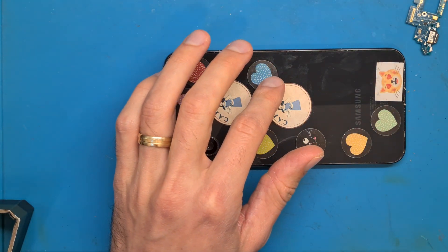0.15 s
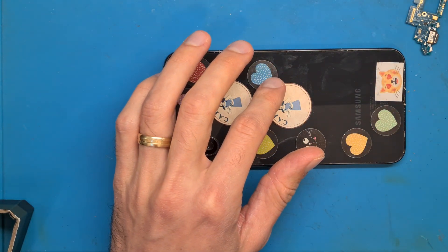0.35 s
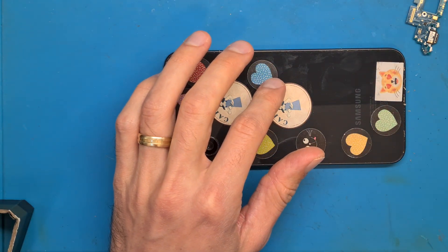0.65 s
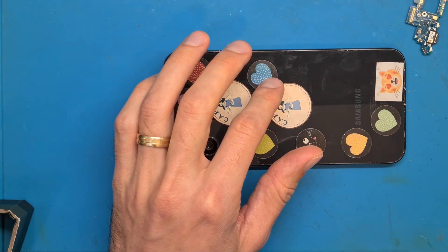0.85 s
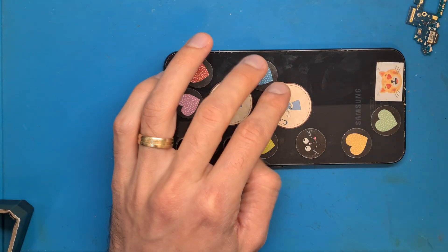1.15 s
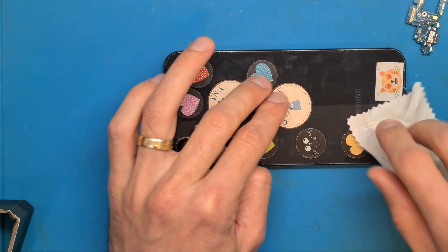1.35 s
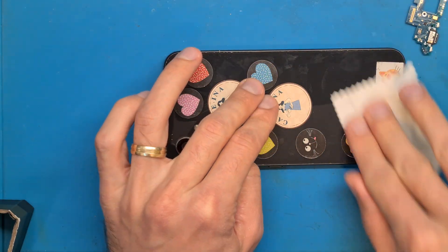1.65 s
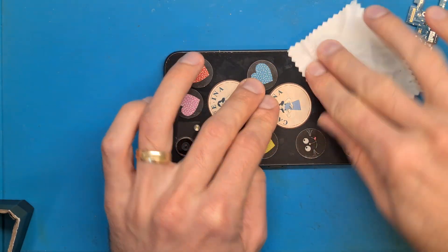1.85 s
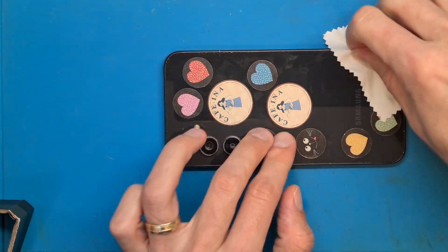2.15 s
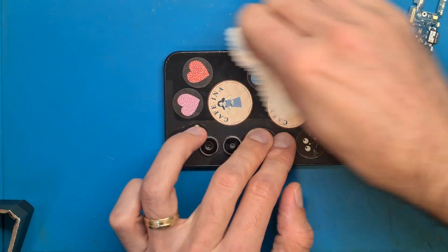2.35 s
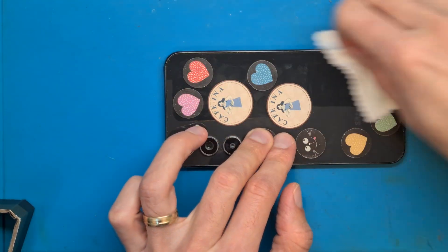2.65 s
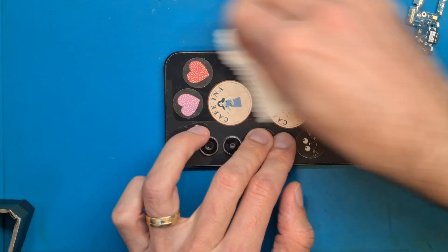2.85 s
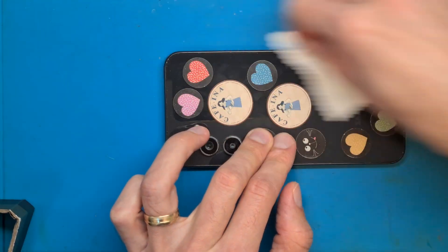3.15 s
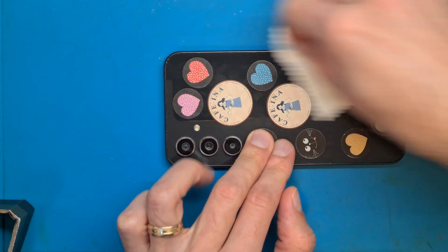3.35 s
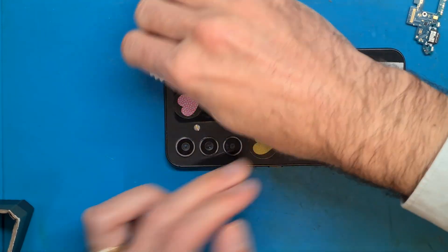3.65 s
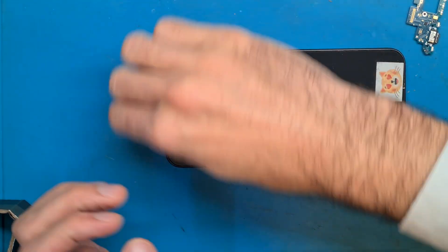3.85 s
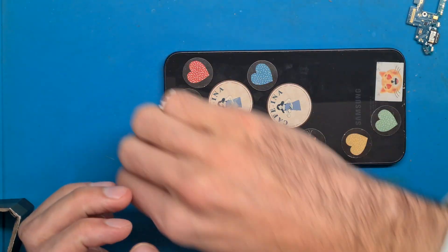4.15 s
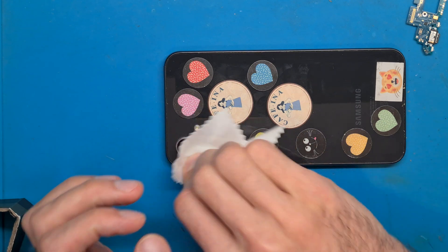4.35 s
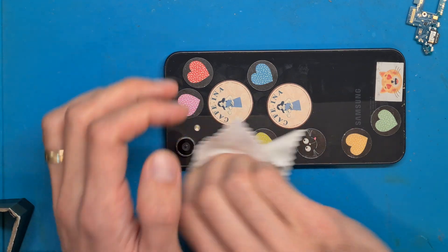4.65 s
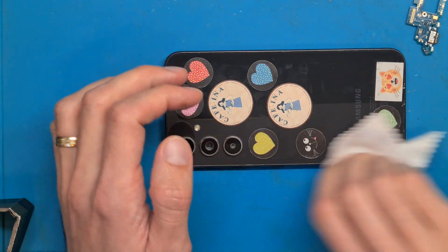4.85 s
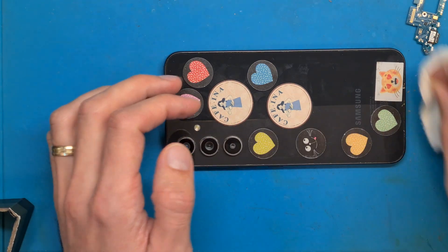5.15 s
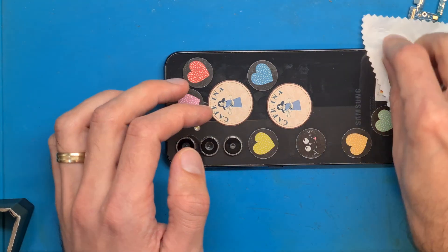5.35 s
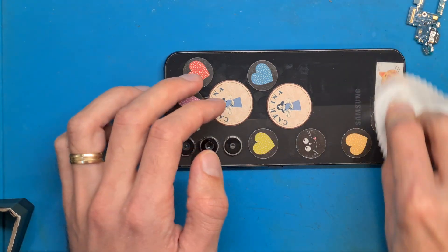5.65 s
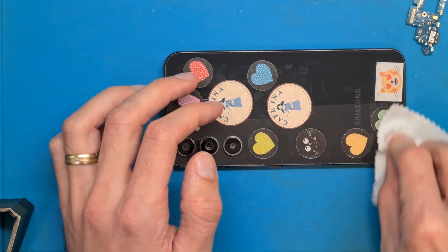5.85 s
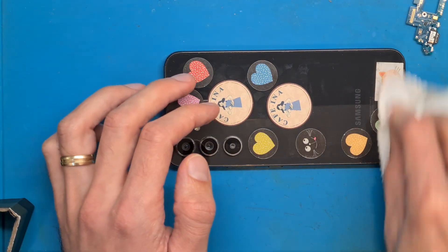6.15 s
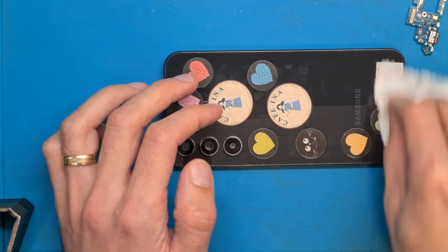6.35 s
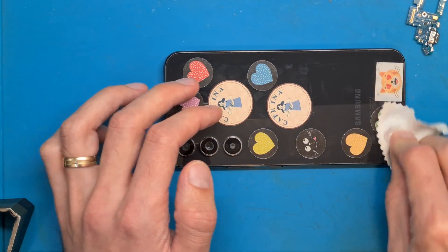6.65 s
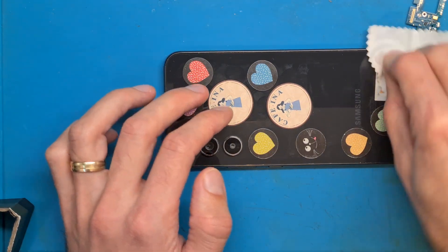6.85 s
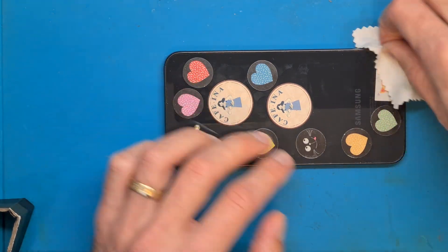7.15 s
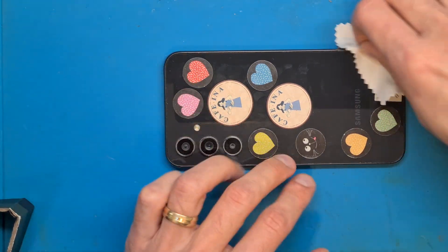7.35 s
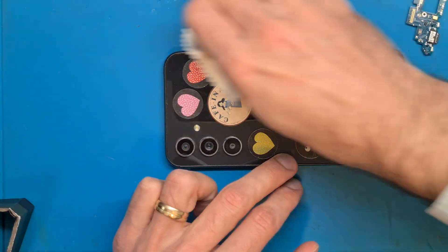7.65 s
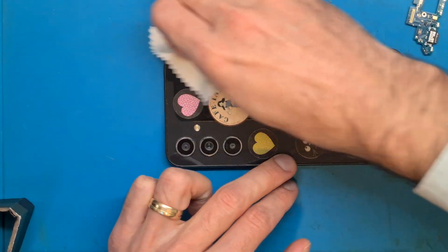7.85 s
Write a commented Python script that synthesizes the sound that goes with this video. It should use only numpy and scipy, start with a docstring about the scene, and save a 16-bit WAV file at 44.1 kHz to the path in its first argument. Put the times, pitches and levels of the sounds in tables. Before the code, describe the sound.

Brief cloth rustles and a cluster of small hard taps come first, then a near pause, then deep muffled bench bumps and swishing wipes over glass. A sharp crack with a tight echo cuts through once. After a short lull with a faint low squeak, longer strokes become quick and regular. Close, intimate stereo pickup, lightly reverberant room, low motor drone and faint fan hiss throughout.

```python
"""A soft cloth wipes the glass back of a phone on a workbench, under a pair of microphones. From the start,
friction noise hisses, swishes and drags; a two-tone engine drone comes through the wall, over a hum of sines,
narrow low rumbles and fan hiss of narrow noise, and broad room noise. Noise-driven body modes tick from 0.1 s,
and hands thump decaying bench modes from 0.6 s. Resonant noise chirps from 1.3 s, decaying modes snap once at
2.6 s, and gliding sines squeak from 3.2 s."""
import sys
import numpy as np
from scipy import signal
from scipy.fft import rfft, irfft
from scipy.io import wavfile
from scipy.ndimage import uniform_filter1d

SR = 44100
rng = np.random.default_rng(int(sys.argv[2]) if len(sys.argv) > 2 else 0)


def file_out(sig):
    """Save sig as 16-bit WAV at sys.argv[1]."""
    # one column per channel
    cols = np.atleast_2d(sig).T
    # limit, then scale
    lim = np.clip(cols, -1, 1)
    pcm = np.round(lim * 32767).astype(np.int16)
    wavfile.write(sys.argv[1], SR, pcm)


N = 352800  # samples: 8 s


# Spectra of fibre hiss, swish on the glass and drag on the mat.
# Each row: frequency in Hz, relative density in dB per Hz.
HISS_SPECTRUM = [(3820, -31), (6500, -6.5), (7410, -12), (8270, -11), (9030, -1.5), (10600, -9),
                 (13000, -4), (15600, -15)]
SWISH_SPECTRUM = [(650, -21), (1100, -10.5), (1500, -10.5), (2300, -9.5), (4510, -6.5), (6950, -21.5),
                  (8000, -44), (10400, -61)]
DRAG_SPECTRUM = [(100, -49), (170, -12), (250, -6.5), (413, -1.5), (760, -13), (1260, -19.5), (1750, -24),
                 (2470, -77.5)]


def cloth():
    """Friction noise: each stroke modulates three depths of rubbing, fibres, glass and mat."""
    hiss_gain, swish_gain, drag_gain = speed_gains()

    fibres = rubbing(HISS_SPECTRUM, 2500, spread_db=3.5, grit=0.6, same=0.3)
    hiss = hiss_gain * amp(0.9 * drift(size=300)) * fibres

    folds = rubbing(SWISH_SPECTRUM, 1500, spread_db=2.5, grit=0.4, same=0.46)
    folds = patchy(folds, patchy_db=2.2)
    swish = swish_gain * amp(1.5 * drift(size=400)) * singing(folds)

    mat = rubbing(DRAG_SPECTRUM, 200, spread_db=0.0, grit=0.8, same=0.76, lag=0.00024)
    mat = patchy(mat, patchy_db=3.0)
    drag = drag_gain * amp(2.0 * drift(size=300)) * mat
    return hiss + swish + drag


# Strokes of cloth and fingers. Each row: start in seconds, length in seconds, fibre hiss at top speed
# in dB, extra swish on the glass in dB, drag on the mat in dB; levels before the creep and drifts.
STROKES = [(0, 0.12, -65, -17, -84), (0.111, 0.079, -58.5, -6.5, -71), (0.203, .041, -63.5, -3, -76),
           (0.37, 0.11, -104, -8, -66.5), (0.542, 0.055, -63.5, 1, -49.5), (0.584, 0.03, -49, -2, -54),
           (0.77, 0.078, -72, -2.5, -61.5), (0.817, 0.049, -67, -1, -53.5), (0.981, 0.066, -67.5, -3, -66),
           (1.192, 0.4, -79, 1.5, -70), (1.975, 0.067, -81, 5.5, -62.5), (2.102, 0.22, -86.5, 7, -68),
           (2.35, 0.44, -77.5, 3, -66), (2.359, 0.072, -76, -5, -47), (2.548, 0.052, -74.5, 19, -61),
           (2.562, .27, -74, -0.5, -83), (2.896, 0.23, -71, -1.5, -65), (3.127, .26, -66.5, -6, -91),
           (3.337, 0.15, -89, 2, -54), (3.384, 0.26, -68, 0.5, -75), (3.775, 0.24, -72.5, -3.5, -60.5),
           (4.004, 0.14, -81.5, -4, -59), (4.662, 0.44, -74.5, -4, -88), (4.939, 0.47, -83, 2.5, -85),
           (5.578, 0.31, -70.5, -4, -58.5), (5.976, 0.21, -69.5, -2.5, -50),
           (6.171, 0.19, -66.5, -1.5, -57), (6.398, 0.18, -67.5, -2.5, -40), (6.572, 0.18, -65, 0, -61),
           (6.775, 0.22, -68.5, -4.5, -45.5), (7.464, 0.16, -83, 4.5, -52.5),
           (7.527, 0.36, -72.5, 4, -59.5), (7.836, 0.13, -101, 0, -56.5)]
# The cloth rustles in the hand between strokes. Each row: time in seconds, hiss in dB.
RUSTLE = [(0, -67), (.1, -75), (.3, -100), (1.0, -106), (1.6, -85.5), (1.85, -83), (3.7, -82.5),
          (4.15, -89.5), (4.5, -83), (5.5, -88.5), (7.0, -83), (8.0, -80)]
RUSTLE_DRAG_DB, RUSTLE_DRAG_SLOPE = -62.5, 0.35  # drag at a middling hiss, and dB per dB of hiss
PEAK_SKEW, DRAG_SKEW = 0.9, 0.98  # under 1: the hand is fastest early; the phone gives way later
CREEP_S, CREEP_SHARE = 0.03, 0.046  # decay time and share of power


def speed_gains():
    """Speed-dependent friction: brief touches are peaky, and drag grows steeply with speed."""
    hiss_db = curves(RUSTLE)[0]
    drag_db = RUSTLE_DRAG_DB + RUSTLE_DRAG_SLOPE * (hiss_db - MIDDLE_DB)
    power = amp(np.transpose([hiss_db, swish_of(hiss_db), drag_db])) ** 2
    skew = np.array([PEAK_SKEW, PEAK_SKEW, DRAG_SKEW])
    speed_power = np.array([2.0, 2.4, 3.6])  # hiss, swish, drag
    for s, length, hiss_db, extra_db, drag_db in STROKES:
        progress = np.linspace(0, 1, round(length * SR))[:, None] ** skew
        speed = np.clip(np.sin(np.pi * progress), 0, 1) ** (0.8 + 0.04 / length)
        levels = amp([hiss_db, swish_of(hiss_db) + extra_db, drag_db])
        add(power, s, speed ** speed_power * levels ** 2)
    # the cloth creeps on softly after the hand stops
    keep = np.exp(-1 / (CREEP_S * SR))
    creep = signal.lfilter([1 - keep], [1, -keep], power.T)
    return np.sqrt(power.T + CREEP_SHARE * creep)


# Swish in dB at a middling hiss, dB it gains per dB of hiss, and that middling hiss in dB.
SWISH_DB, SWISH_SLOPE, MIDDLE_DB = -63, 0.9, -69.5


def swish_of(hiss_db):
    """Linear coupling in dB: the swish on the glass follows the hiss of the fibres."""
    return SWISH_DB + SWISH_SLOPE * (hiss_db - MIDDLE_DB)


# Stereo tilt of the rubbing. Each row: frequency in Hz, left minus right in dB.
RUB_BALANCE = [(300, 2), (1300, -2), (4400, -3), (9000, 3)]
LAG_S = 0.000372  # the bench is nearer the left microphone


def rubbing(spectrum, per_s, spread_db, grit, same, lag=LAG_S):
    """Superposition: many fibres blur into noise; the few that catch and snap stand out as grit."""
    caught = rng.random(N) < per_s / SR
    snaps = amp(spread_db * np.minimum(rng.exponential(1, N), 5)) * caught
    snaps = snaps * rng.choice([-1., 1.], N)
    common = rng.standard_normal(N) + grit * evened(snaps)
    same = np.clip(same, 0, 1)  # share of power common to both channels
    apart = np.sqrt(same) * evened(common) + np.sqrt(1 - same) * rng.standard_normal((2, N))
    return pair(apart, spectrum, RUB_BALANCE, lag)


def patchy(x, patchy_db):
    """Changing contact area: the colour shifts as folds of cloth take and lose contact."""
    z = signal.stft(x, nperseg=512)[2]
    patches = rng.standard_normal(z.shape[1:])
    patches = uniform_filter1d(patches, size=5, axis=0)  # across frequency
    patches = uniform_filter1d(patches, size=6, axis=1)  # across time
    coloured = z * amp(patchy_db * evened(patches))
    return evened(signal.istft(coloured, nperseg=512)[1][:, :N])


GLASS_WIDTH, GLASS_GAIN, GLASS_WAVER_DB = 140, 0.6, 5.0  # Hz, added gain at a peak, rms waver in dB


def singing(x):
    """Forced resonance: the rubbed phone lends its modes, each coming and going as the cloth moves on."""
    hz, t, z = signal.stft(x, SR, nperseg=512)
    mode_hz = np.transpose(PHONE_MODES)[0]
    waver = rng.standard_normal((len(t), len(PHONE_MODES)))
    waver = evened(uniform_filter1d(waver, size=8, axis=0))
    peaks = 1 / (1 + (2 * (hz[:, None] - mode_hz) / GLASS_WIDTH) ** 2)
    gain = 1 + GLASS_GAIN * peaks @ amp(GLASS_WAVER_DB * waver).T
    return evened(signal.istft(z * gain, nperseg=512)[1][:, :N])


# The damp cloth sticks and slips on the glass. Each row: start in seconds, length in seconds,
# first pitch in Hz, last pitch in Hz, level in dB before swell and flutter.
SQUEAKS = [(3.233, 0.09, 2080, 2025, -72), (4.228, 0.22, 400, 448, -61), (6.274, 0.072, 1950, 1490, -74),
           (6.655, 0.071, 2150, 1720, -69.5)]


def squeaks():
    """Stick-slip friction: faint unsteady tones that swell, glide and fade."""
    out = np.zeros(N)
    waver, flutter = drift(size=300), drift(size=300)
    for s, length, first_hz, last_hz, db in SQUEAKS:
        progress = np.linspace(0, 1, round(length * SR))
        part = slice(round(s * SR), round(s * SR) + len(progress))
        hz = (first_hz + (last_hz - first_hz) * progress) * (1 + 0.048 * waver[part])
        swell = np.sin(np.pi * np.sqrt(progress)) * amp(db + 5.4 * flutter[part])
        add(out, s, swell * np.sin(2 * np.pi * np.cumsum(hz) / SR))
    return np.sqrt(2) * out


# Brief chirps as the cloth catches on the glass. Each row: start in seconds, level in dB before the
# rise and decay, pitch in Hz.
CHIRPS = [(1.287, -57, 4070), (2.183, -61.5, 5102), (4.621, -67, 3230), (4.65, -65, 3163),
          (4.686, -61, 3240), (4.934, -64, 2377)]
CHIRP_RISE_S, CHIRP_T60_S, CHIRP_WIDTH = 0.0026, 0.069, 320  # width in Hz of each of two passes


def chirps():
    """Resonant filtering: short noisy bursts of slipping through one narrow resonance."""
    out = np.zeros((2, N))
    t = np.arange(3000) / SR
    for s, db, hz in CHIRPS:
        common, *own = rng.standard_normal((3, len(t)))
        tone = np.array([narrow(common + 0.5 * n, hz, CHIRP_WIDTH) for n in own])
        envelope = amp(db - 60 * t / CHIRP_T60_S) * np.minimum(t / CHIRP_RISE_S, 1)
        add(out.T, s, (envelope * tone).T)
    return out


# The phone ticks and scuffs. Each row: start in seconds, peak in dB, brightest pitch in Hz,
# contact in seconds.
TICKS = [(.12, -50.5, 2360, 0.0076), (.151, -51, 2400, 0.0065), (.219, -55, 11100, 0.0069),
         (.395, -56, 775, 0.0038), (0.555, -45.5, 930, 0.015), (.566, -45, 2380, 0.004),
         (.589, -36, 935, 0.0074), (0.5979, -32, 910, 0.0022), (.612, -53, 940, 0.0073),
         (.781, -44.5, 530, 0.0088), (1.012, -53, 3686, 0.002), (1.465, -54.5, 2060, 0.002),
         (1.649, -50, 930, 0.0051), (2.003, -55, 2360, 0.0018), (2.087, -47, 944, 0.0069),
         (2.378, -42, 1370, 0.0026), (2.498, -57, 12200, 0.0035), (3.37, -47.5, 1400, 0.0019),
         (3.427, -48.5, 1470, 0.0022), (3.86, -50, 860, 0.014), (4.021, -49.5, 700, 0.0041),
         (4.083, -50, 1100, 0.0063), (4.99, -51.5, 900, 0.0081), (5.091, -45, 745, 0.015),
         (5.656, -53, 1498, 0.007), (6.001, -40.5, 800, 0.0011), (7.148, -51.5, 894, 0.0025),
         (7.266, -51, 3070, 0.0014), (7.479, -41.5, 1300, 0.0019)]
# Modes of the phone's body. Each row: frequency in Hz, relative level in dB, t60 in seconds.
PHONE_MODES = [(510, 0, .025), (740, 0, .05), (920, 0, .025), (1200, -5, .015), (1620, -1, .015),
               (2060, 0, .015), (2870, 0, .02), (3700, -1, .01), (5450, -5, .008), (6280, -6, .008),
               (9500, -8, .004), (12500, -8, .004)]
FOCUS_DB_PER_MS = 5.5  # a longer contact picks one pitch: fall an octave away, for each ms of contact


def ticks():
    """Modal excitation: a rough contact rings the body, most near the pitch of the place touched."""
    out = np.zeros((2, N))
    body_hz = np.transpose(PHONE_MODES)[0][:, None]
    t = np.arange(2000) / SR
    for s, db, hz, contact in TICKS:
        fall_db = FOCUS_DB_PER_MS * contact / 1e-3
        weight_db = -abs(fall_db * np.log2(body_hz / hz))
        body = ring(PHONE_MODES, soft=0.00012, weight_db=weight_db, spread=0.02)
        contact = max(contact, 1e-4)
        scrape = np.exp(-t / contact) * (1 - np.exp(-t / (0.6 * contact)))
        common, *own = rng.standard_normal((3, 2000)) * scrape
        tick = np.array([signal.fftconvolve(body, common + 0.5 * rough) for rough in own])
        add(out.T, s, amp(db) * tick.T / abs(tick).max())
    return out


# Hands land on the bench. Each row: start in seconds, peak of the thump in dB before knock and boom,
# knock over thump in dB.
THUMPS = [(0.596, -35, -18), (1.651, -19.5, -31.5), (2.006, -31.5, -33), (2.082, -18.5, -3),
          (2.189, -20, -29), (2.368, -41.5, -1), (3.006, -41.5, 8), (3.56, -37, -5.5), (3.813, -38.5, -15),
          (5.089, -34, -3.5), (5.41, -38, -3), (6.511, -40.5, 2), (7.083, -32.5, -5), (7.146, -38.5, -4.5),
          (7.266, -32.5, -6), (7.468, -33, -8.5)]
# Thump modes of the bench and knock modes of its top.
# Each row: frequency in Hz, relative level in dB, t60 in seconds.
BENCH_MODES = [(102, 8, 0.06), (129.7, -7.5, 0.098)]
TOP_MODES = [(218, -0.5, 0.16), (316.6, -5, 0.1), (350.4, 6.5, 0.042), (488.5, -0.5, 0.05)]
KNOCK_LEFT_DB = 4  # left minus right
BOOM_DB, BOOM_T60_S = -10.5, 0.49  # the bench keeps rumbling after a blow


def thumps():
    """Impact on a structure: a soft blow swings the whole bench, its top knocks, and a rumble lingers."""
    swing, knock = np.zeros((2, N))
    for s, db, knock_db in THUMPS:
        add(swing, s, amp(db) * ring(BENCH_MODES, soft=0.015))
        add(knock, s + 0.0012, amp(db + knock_db) * ring(TOP_MODES, soft=0.0032, spread=0.042))
    blows = swing + knock * amp(KNOCK_LEFT_DB * np.array([[0.5], [-0.5]]))
    t = np.arange(SR // 2) / SR
    fade = amp(-60 * t / BOOM_T60_S) * (1 - np.exp(-t / 0.02))
    common, *own = rng.standard_normal((3, len(t))) * fade
    tail = common + 0.14 * np.array(own)
    boom = signal.fftconvolve(blows, tail / np.linalg.norm(tail[0]), axes=1)[:, :N]
    return blows + amp(BOOM_DB) * boom


# Modes of the snap. Each row: frequency in Hz, relative level in dB, t60 in seconds.
SNAP_MODES = [(482, 0.5, 0.025), (930, -11, 0.0097), (1570, 17, 0.0061), (2620, 7.5, 0.014),
              (2980, 9, 0.0091), (3806, 7, 0.0086), (5170, -4, 0.0097)]
SNAP_S, SNAP_DB = 2.5658, -22.5  # start, and peak before the gains of the two arrivals


def snap():
    """Modal decay and interaural delay: a crack with one close echo reaches the right microphone first."""
    out = np.zeros((2, N))
    crack = amp(SNAP_DB) * ring(SNAP_MODES, soft=0.0005)
    for delay, db in [(0, 10.5), (0.0035, 0)]:  # direct sound, then the echo
        add(out[0], SNAP_S + delay + 0.00023, crack * amp(db - 1.4))
        add(out[1], SNAP_S + delay, crack * amp(db + 1.4))
    return out


# Echoes of the room. Each row: frequency in Hz, t60 in seconds.
ROOM_DECAY = [(200, .3), (1000, .38), (3000, .4), (9000, .2)]


def room(x):
    """Reverberation: sparse echoes of random sign, each band dying at its own speed."""
    taps = np.zeros((2, SR // 2))
    at = np.arange(200, SR // 2 - 20, 20) + rng.integers(0, 20, (2, (SR // 2 - 201) // 20))
    np.put_along_axis(taps, at, rng.choice([-1., 1.], at.shape), 1)
    hz, t, z = signal.stft(taps, SR, nperseg=256)
    fade = amp(-60 * t / read(ROOM_DECAY, hz)[:, None])
    tail = signal.istft(z * fade, SR, nperseg=256)[1]
    return signal.fftconvolve(x, tail / np.linalg.norm(tail[0]), axes=1)[:, :N]


# Distant engine. Each row: time in seconds, firing rate in Hz and level in dB, before waver and dips.
ENGINE = [(0, 57.45, -52.5), (.7, 53.2, -46.5), (1.6, 56.3, -33.5), (2.1, 57.74, -33), (2.74, 59.8, -45),
          (3.1, 59.48, -40.5), (3.3, 59.34, -56.5), (3.6, 58.5, -37.5), (3.95, 56.6, -44),
          (4.35, 55.4, -34), (4.9, 57.5, -34), (5.2, 60.98, -52), (5.45, 61.1, -35.5), (5.7, 62.8, -47),
          (6.3, 57, -36.5), (6.66, 49.75, -42), (7, 57.67, -45.5), (7.4, 49.5, -41.5), (7.78, 51.3, -37),
          (8, 57.2, -51.5)]
# Second multiple of the firing rate. Each row: time in seconds, level in dB before waver.
OVERTONE = [(0, -65.5), (3.4, -57.5), (8, -51.5)]
# The first tone dips briefly. Each row: time in seconds, depth in dB.
DIPS = [(1.691, 11), (2.199, 17), (3.22, 17), (3.59, 13), (3.9, 7), (4.449, 11.5), (5.51, 23), (6.73, 15),
        (7.28, 25)]
DIP_S = 0.047  # half width
# Narrow rumbles. Each row: frequency in Hz, width in Hz of each of two passes, # level in dB.
RUMBLE = [(30.1, 4.2, -55), (97.7, 13, -58)]


def engine():
    """Harmonic source: two wavering firing tones, beside narrow-band rumbles."""
    hz, level_db = curves(ENGINE)
    t = np.arange(N) / SR
    level_db = level_db - sum(db * np.exp(-((t - s) / DIP_S) ** 2) for s, db in DIPS)
    turns = np.cumsum(hz * (1 + 0.013 * drift(size=3000))) / SR
    tones = amp(level_db + 2.0 * drift(size=1500)) * np.sin(2 * np.pi * turns)
    overtone_gain = amp(curves(OVERTONE)[0] + 5.1 * drift(size=1500))
    tones += overtone_gain * np.sin(4 * np.pi * turns + 1)
    rumbles = [amp(db) * narrow(rng.standard_normal(N), f, width) for f, width, db in RUMBLE]
    return np.sqrt(2) * tones + sum(rumbles)


# Mains hum. Each row: frequency in Hz, rms level in dB before a slight drift.
HUM = [(199, -57.5), (150.4, -65), (401, -74)]


def hum():
    """Harmonics of the mains: tones of fixed pitch near its multiples, almost steady in level."""
    t = np.arange(N) / SR
    out = np.zeros(N)
    for hz, db in HUM:
        out += np.sqrt(2) * amp(db + 0.48 * drift(size=4000)) * np.sin(2 * np.pi * hz * t)
    return out


# Spectrum of the room tone. Each row: frequency in Hz, relative density in dB per Hz.
AIR_SPECTRUM = [(12, -35), (24, 0.5), (44, 3), (68, 0), (153, -14.5), (252, -18.5), (394, -25), (615, -34),
                (1200, -35.5), (2150, -50.5), (3460, -55.5), (7130, -70), (12800, -54), (15600, -58)]
# Coherence of the room tone. Each row: frequency in Hz, left-right likeness (1 is identical).
AIR_SAME = [(60, 1), (130, 0.29), (290, 0.53), (640, 0.27), (1400, 0.033)]
# Stereo tilt of the room tone. Each row: frequency in Hz, left minus right in dB.
AIR_BALANCE = [(60, 0), (250, 2), (1300, -2), (4400, -3), (9000, 2)]
AIR_DB = -49.5  # before drift
FAN_HZ, FAN_WIDTH, FAN_DB = 3283, 620, -76  # width in Hz of each of two passes; level before drift


def room_tone():
    """Diffuse-field coherence: broad noise alike in both ears in the bass, with a fan's narrow hiss."""
    hz = np.fft.rfftfreq(N, 1 / SR)
    left, other = rfft(rng.standard_normal((2, N)))
    same = np.clip(read(AIR_SAME, hz), -1, 1)
    right = same * left + np.sqrt(1 - same ** 2) * other
    both = irfft(np.array([left, right]), N)
    fan = np.array([narrow(n, FAN_HZ, FAN_WIDTH) for n in rng.standard_normal((2, N))])
    air = amp(AIR_DB + 2.24 * drift(size=5000)) * pair(both, AIR_SPECTRUM, AIR_BALANCE, 0)
    return air + amp(FAN_DB + 2.6 * drift(size=2000)) * fan


def ring(modes, soft, weight_db=0, spread=0):
    """Modal decay: modes die away after a blow that takes soft seconds to build; peak 1."""
    t = np.arange(9000) / SR
    hz, db, t60 = np.transpose(modes)[:, :, None]
    detune = 1 + spread * rng.standard_normal(hz.shape)
    y = (amp(db + weight_db - 60 * t / t60) * np.sin(2 * np.pi * hz * detune * t)).sum(axis=0)
    y = y * (1 - np.exp(-(t / soft) ** 2))
    return y / abs(y).max()


def resonate(x, hz, width):
    """Heterodyne resonance: shifts hz down to zero, smooths, and shifts back."""
    turn = np.exp(2j * np.pi * np.cumsum(hz * np.ones(len(x))) / SR)
    r = np.exp(-np.pi * width / SR)
    return 2 * (turn * signal.lfilter([1 - r], [1, -r], x / turn)).real


def narrow(x, hz, width):
    """Cascaded resonance: two passes through one resonator, at rms 1."""
    return evened(resonate(resonate(x, hz, width), hz, width))


def pair(x, spectrum, balance, lag):
    """Level and time differences: colours and tilts two channels, the right one later by lag; rms 1."""
    hz = np.fft.rfftfreq(N, 1 / SR)
    side = np.array([[0.5], [-0.5]])
    gain = amp(read(spectrum, hz) + side * read(balance, hz))
    z = rfft(x) * gain * np.exp(2j * np.pi * side * hz * lag)
    return evened(irfft(z, N))


def drift(size):
    """Low-passed chance: a slow random curve of rms 1, smooth over size samples."""
    return evened(uniform_filter1d(uniform_filter1d(rng.standard_normal(N), size), size))


def curves(rows):
    """Linear interpolation: the columns of a table of curves at every sample."""
    s, *columns = np.transpose(rows)
    return [np.interp(np.arange(N) / SR, s, c) for c in columns]


def read(points, hz):
    """Logarithmic frequency: a spectrum table read on a log axis."""
    f, value = np.transpose(points)
    return np.interp(np.log(hz + 1), np.log(f + 1), value)


def add(mix, s, sound):
    """Superposition: lays a sound into the mix at s seconds."""
    part = mix[round(s * SR):][:len(sound)]
    part += sound[:len(part)]


def amp(db):
    """Decibel law: the gain of a level in dB."""
    return 10 ** (np.asarray(db) / 20)


def evened(x):
    """Root mean square: scaled to rms 1."""
    return x / np.sqrt(np.mean(x ** 2) + 1e-20)


def scene():
    """Superposition: everything on the bench, its echoes, and the sounds around it."""
    tick, crack, thump, wipe = ticks() + chirps(), snap(), thumps(), cloth()
    # each source feeds the room at its own level
    echoes = room(amp(-7.5) * tick + amp(-21.5) * thump + amp(-26) * crack + amp(-9.5) * wipe)
    bench = tick + crack + thump + wipe + squeaks()
    return bench + echoes + engine() + hum() + room_tone()


def record(dry):
    """Band limit: a steep linear-phase low-pass at 15720 Hz."""
    lowpass = signal.firwin(1501, 15720, window=("kaiser", 9), fs=SR)
    return signal.oaconvolve(dry, lowpass[None], "same")


dry = scene()
out = record(dry)
file_out(out)
```